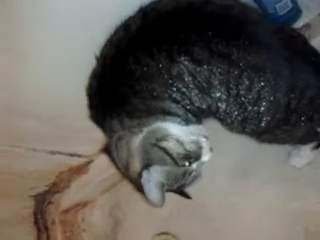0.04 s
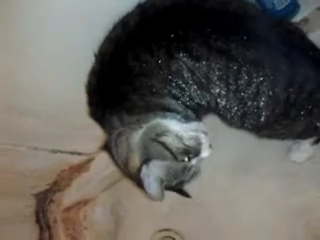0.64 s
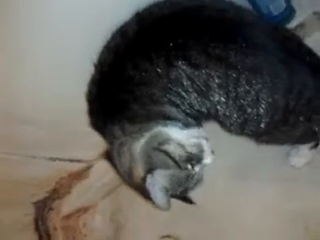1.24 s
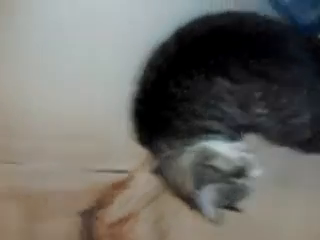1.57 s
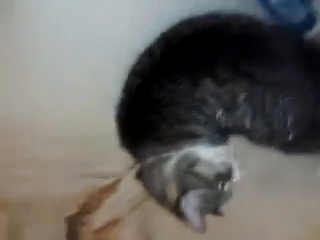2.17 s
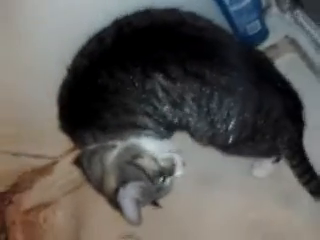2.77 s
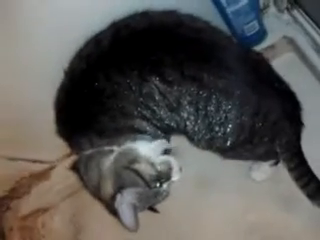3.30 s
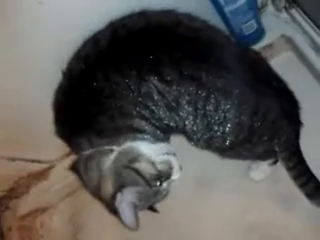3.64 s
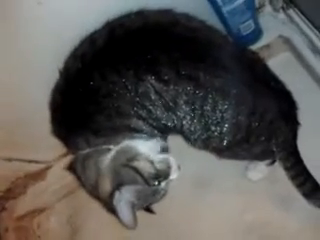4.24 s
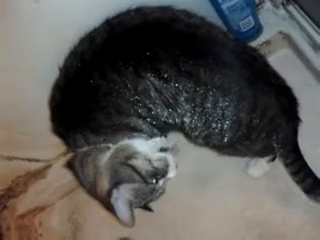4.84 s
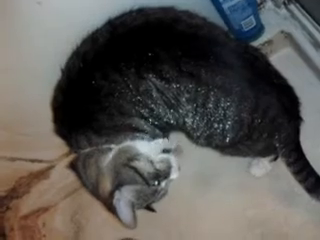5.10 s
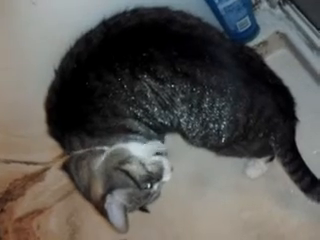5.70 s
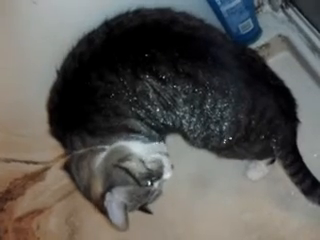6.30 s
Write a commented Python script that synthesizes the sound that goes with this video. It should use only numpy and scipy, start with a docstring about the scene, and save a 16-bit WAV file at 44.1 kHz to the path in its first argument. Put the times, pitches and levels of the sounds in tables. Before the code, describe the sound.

Water drips from a shower head throughout, heard from just above the floor of a small hard-walled stall with a very short echo. Sharp, high ticks hit the wet floor at irregular times and strengths, over a fine patter and a lighter, even drip of nearly five drops a second. Soft splashes on a cat's wet fur and faint, dull thuds on the hollow tray are mixed in. A stronger tick lands at about 0.7 seconds, a cluster between 2.1 and 2.8, and others at 3.4 and 5.1. The loudest drop snaps at about 6 seconds. Running-off water gives a faint, brief gurgle at around 0.7 and 3.2 seconds, and a barely audible thin tone slides down from 3.2 to 3.7. Underneath, a distant machine keeps up a low steady hum and rumble, with a soft wash of air and trickling water.

```python
"""A small hard-walled shower stall, the microphone above the floor, a shower head dripping onto a wet cat.
One nozzle leaks at a steady beat, others let go at random. Drops tick sharply on the wet floor,
splash softly on fur and now and then thud on the hollow tray, over a fine patter.
Water gurgles off twice and a faint tone slides down once. The close walls throw every drop back
at once; farther off, a machine hums low in the building."""
import sys
import numpy as np
from scipy import signal
from scipy.fft import rfft, irfft, next_fast_len
from scipy.io import wavfile
from scipy.ndimage import map_coordinates

SR = 44100
rng = np.random.default_rng(int(sys.argv[2]) if len(sys.argv) > 2 else 0)


def transcribe(signal):
    """Save signal, clipped to [-1, 1], as a 16-bit WAV file at the path in sys.argv[1]."""
    frames = np.atleast_2d(signal).T
    limited = np.clip(frames, -1, 1)
    pcm = np.round(limited * 32767).astype(np.int16)
    wavfile.write(sys.argv[1], SR, pcm)


N = 280917
TOUCH_LEAD_S = .0045  # a drop touches the water film this long before it snaps

# Drops landing squarely on the wet floor. Each row: time in seconds, tick level in dB, pitch in Hz,
# ring time in ms, gain of the slap, knock and echo in dB.
FLOOR_HITS = [(0.4349, -34.5, 6400, 0.19, 7), (0.599, -42.5, 6470, 0.81, 4.5),
              (0.651, -25, 6930, 0.27, -2.5), (0.679, -38.5, 6400, 0.77, 2.5),
              (0.861, -39.5, 6260, 0.54, -2), (0.908, -39.5, 5770, 0.48, 0.5),
              (1.499, -29.5, 6900, 0.28, -5), (1.7144, -30, 5860, 0.2, -2), (1.779, -49, 5150, 0.54, 12.5),
              (1.929, -29.5, 6400, 0.6, -3.5), (2.033, -42, 5330, 0.4, 8), (2.1387, -24.5, 6120, 0.39, -1),
              (2.353, -22.5, 6520, 0.27, -4.5), (2.522, -46, 4800, 1, -29), (2.5671, -19, 6100, 0.32, 2),
              (2.6624, -36.5, 5840, 0.53, -3), (2.691, -42, 5060, 0.96, 4.5),
              (2.7773, -17.5, 7040, 0.24, -6.5), (2.81, -29, 7300, 0.22, 2.5), (2.9111, -37, 5280, 0.57, 1),
              (3.1973, -29, 5800, 0.19, 5), (3.3213, -35.5, 6100, 0.55, 1.5),
              (3.416, -23.5, 6880, 0.31, -3.5), (3.568, -37.5, 5550, 0.59, -3),
              (3.6281, -29, 6270, 0.21, -4.5), (4.055, -31.5, 6200, 0.22, 0.5),
              (4.1221, -27.5, 5770, 0.23, -4.5), (4.2368, -38.5, 5570, 0.58, -8),
              (4.266, -35.5, 6000, 0.19, 4), (4.48, -37.5, 5800, 0.39, 2.5), (4.5625, -36.5, 6000, 0.24, 4),
              (4.783, -37.5, 5560, 0.35, -6), (4.8172, -40, 5080, 0.58, 2.5),
              (4.9053, -37.5, 6000, 0.18, 8), (4.95, -39, 5100, 0.098, 5), (5.1226, -18.5, 6030, 0.4, -3),
              (5.3331, -28, 6200, 0.16, 3), (5.4449, -30, 5480, 0.44, -2), (5.4776, -36, 5200, 0.52, 0.5),
              (5.6604, -35, 6680, 0.97, -2.5), (5.7402, -39, 5380, 1, -14), (5.9717, -12, 5400, 0.23, -1),
              (5.9773, -24, 6900, 0.27, 3), (6.074, -35.5, 6300, 0.19, 2), (6.114, -38, 5300, 0.48, -1),
              (6.1856, -31, 5500, 0.17, 0), (6.335, -35, 6440, 0.21, 2.5)]
# Stray drops ticking on the wet floor. Each row: start in seconds, level in dB.
STRAY_TICKS = [(0.0082, -39), (0.0994, -37), (0.959, -41), (1.2435, -41.5), (1.7469, -39), (3.6066, -40),
               (3.8919, -37.5), (4.5084, -37.5), (4.9216, -41), (5.585, -34)]
# The floor's knock under a tick. Each row: mode in Hz, relative level in dB, 60 dB decay in seconds.
FLOOR_MODES = [(547, -0.5, 0.12), (729, -5, 0.2), (893, 10, 0.028), (1173, -1.5, 0.12), (1303, 6.5, 0.022)]
# The larger splashes on fur. Each row: start in seconds, relative level in dB, centre pitch in Hz,
# pitch spread of the droplets in natural-log units.
FUR_SPLASHES = [(0.0, -57, 1700, 0.45), (0.255, -64, 860, 0.37), (0.438, -51.5, 6650, 0.084),
                (0.44, -62, 2100, 0.17), (0.525, -57.5, 2830, 0.2), (0.669, -64, 2380, 0.09),
                (0.951, -61.5, 1720, 0.19), (1.07, -63, 2130, 0.26), (1.076, -59, 6160, 0.1),
                (1.148, -64.5, 2900, 0.13), (1.412, -59, 2810, 0.076), (1.711, -61.5, 2330, 0.073),
                (1.802, -59, 2540, 0.21), (1.897, -58, 5770, 0.18), (1.915, -64.5, 1520, 0.05),
                (2.058, -60.5, 3330, 0.23), (2.335, -63.5, 2440, 0.12), (2.41, -65.5, 1250, 0.38),
                (2.643, -61.5, 2200, 0.043), (2.717, -58.5, 4380, 0.44), (2.801, -66, 1380, 0.33),
                (3.012, -64.5, 2840, 0.22), (3.196, -66, 1840, 0.37), (3.834, -59.5, 4750, 0.35),
                (3.846, -66.5, 2040, 0.34), (4.324, -62.5, 2560, 0.19), (4.577, -58.5, 4440, 0.3),
                (5.279, -63.5, 4020, 0.1), (5.333, -61.5, 1060, 0.2), (5.415, -59, 2610, 0.59),
                (5.509, -60, 5280, 0.41), (5.54, -59.5, 1080, 0.35), (5.683, -61, 2690, 0.24),
                (5.76, -58, 4970, 0.37), (5.836, -65, 1260, 0.21), (6.069, -67.5, 1880, 0.092)]
# The heaviest drops on the tray. Each row: start in seconds, relative level in dB.
TRAY_HITS = [(0.081, -57), (0.457, -54.5), (0.51, -54.5), (0.726, -54.5), (1.022, -57), (1.34, -55),
             (1.376, -57), (1.621, -58), (1.984, -54), (2.051, -54), (2.394, -54), (2.577, -47),
             (3.115, -56.5), (4.395, -55), (4.516, -54.5), (5.104, -54), (5.432, -57.5), (5.712, -53.5),
             (5.861, -56), (5.976, -54.5), (6.246, -56)]
# The hollow tray's ring. Each row: mode in Hz, relative level in dB, 60 dB decay in seconds.
TRAY_MODES = [(258.9, 5, 0.22), (150.8, -3, 0.2), (349.6, 2, 0.068), (456, -7, 0.19), (585, -5, 0.099),
              (754, -5, 0.11)]
# Water running off. Each row: start in seconds, length in seconds, level in dB, centre pitch in Hz.
RUNOFF = [(0.684, .22, -63, 880), (3.197, .09, -61, 886)]
# How strongly the fine patter falls. Each row: time in seconds, gain in dB.
PATTER_FLOW = [(0, -0.5), (2.801, -1), (3.7, -2), (4.6, -1.5), (5.499, 0.5), (6.3, -3)]
# The faint falling tone. Each row: time in seconds, pitch in Hz, relative level in dB.
TONE_GLIDE = [(3.19, 605, -73), (3.238, 587, -63), (3.3, 579, -71), (3.37, 542, -64), (3.42, 492, -67.5),
              (3.7, 500, -89)]
# The machine's steady tones. Each row: frequency in Hz, rms level in dB.
MACHINE_TONES = [(41.9, -52), (58.5, -61.5)]
# The building's rumble. Each row: frequency in Hz, relative level in dB.
RUMBLE_SPECTRUM = [(10, -3), (24, 0), (35, 0), (44, -13), (75, -15), (100, -18), (150, -28), (250, -60)]
# The wash of air and trickling water. Each row: frequency in Hz, relative level in dB.
WASH_SPECTRUM = [(100, 1.5), (150, 3.5), (300, -1.5), (650, -6), (1150, -14), (1700, -19), (2400, -13.5),
                 (3300, -8.5), (4400, -20), (6200, -10), (7500, -16)]
# The stall's reverberation. Each row: frequency in Hz, 60 dB decay in seconds.
STALL_DECAY = [(250, 0.14), (1000, 0.14), (3000, 0.2), (7000, 0.14)]
# The microphone's colour. Each row: frequency in Hz, gain in dB.
MIC_RESPONSE = [(1800, 0), (2400, .5), (3400, -2.5), (3800, 0), (4150, 4), (4700, 1), (6300, 0), (7200, -1)]


def floor_drips(stray_hz=6030, stray_ring_s=.00025):
    """Square hits on the wet floor, sharpest at the microphone, and the ticks of stray drops."""
    out = np.zeros(N)
    for s, db, hz, ring_ms, echo_db in FLOOR_HITS:
        add(out, s - TOUCH_LEAD_S, amp(db) * drip(hz, ring_ms, echo_db))
    for s, db in STRAY_TICKS:
        tick = ping(seconds(.01), stray_hz * rng.uniform(.9, 1.1), stray_ring_s)
        add(out, s, amp(db) * in_stall(tick, wet_db=0))
    return out


def drip(hz, ring_ms, echo_db, touch_db=-22, slap_db=-33.5, slap_lag_s=.0015, knock_db=-37):
    """One drop hisses into the water film, snaps, slaps the film aside and knocks the floor."""
    out, tick, t = np.zeros(SR // 2), np.zeros(SR // 40), seconds(.01)
    for progress in np.sqrt(rng.random(8)):
        touch = ping(t, hz * rng.uniform(.8, 1.2), ring_s=.0003)
        add(tick, progress * TOUCH_LEAD_S, amp(touch_db) * progress * touch)
    add(tick, TOUCH_LEAD_S, ping(t, hz, ring_ms / 1000))
    add(out, 0, in_stall(tick, echo_db))
    slap = splash(centre_hz=969, spread=.19, length_s=.01099)
    knock = in_stall(struck(FLOOR_MODES, scatter_db=2), wet_db=-2)
    add(out, TOUCH_LEAD_S + slap_lag_s, amp(slap_db + echo_db) * slap)
    add(out, TOUCH_LEAD_S + slap_lag_s, amp(knock_db + echo_db) * knock)
    return out


def leaking_nozzle(first_s=.2232, period_s=.21295, jitter_s=.001, splash_db=-71.5, tick_db=-34):
    """One nozzle fills and lets go at an even beat; its drops splash on fur and tick lightly."""
    out, hit_times = np.zeros(N), np.transpose(FLOOR_HITS)[0]
    for beat in np.arange(first_s, N / SR, period_s):
        late, size_db, pitch = bounded_normal(3)
        s, size, tuning = beat + jitter_s * late, amp(size_db), np.exp(.06 * pitch)
        add(out, s, size * amp(splash_db) * splash(centre_hz=1920 * tuning, spread=.5))
        if np.abs(hit_times - beat).min() > .012:  # no square floor hit already ticks on this beat
            tick = drip(hz=6600 * tuning, ring_ms=.2, echo_db=1)
            add(out, s - TOUCH_LEAD_S, size * amp(tick_db) * tick)
    return out


def fur_splashes(gain_db=3.5):
    """Larger splashes on fur: a plink with a clear bubble if the droplets are alike, else a splat."""
    out = np.zeros(N)
    for s, db, hz, spread in FUR_SPLASHES:
        bubble_db = 1.5 - 35 * spread
        sound = splash(hz, spread, cycles=1.4, bubble_s=.0025, bubble_db=bubble_db, wet_db=-1.5, count=13)
        add(out, s, amp(db + gain_db) * sound)
    return out


def splash(centre_hz, spread, length_s=.036, cycles=2, bubble_s=.0017, bubble_db=-7, wet_db=1, count=18):
    """A drop bursts into a thinning cluster of droplets and traps one ringing bubble."""
    cluster, t = np.zeros(SR // 10), seconds(.016)
    delays = length_s * rng.beta(1.1, 2.4, count)
    pitches = centre_hz * np.exp(spread * bounded_normal(count))
    sizes = amp(3.5 * rng.standard_normal(count))
    for delay, hz, size in zip(delays, pitches, sizes):
        add(cluster, delay, size * ping(t, hz, cycles / hz))
    bubble = ping(t, centre_hz, bubble_s)
    bubble *= np.linalg.norm(cluster) / np.linalg.norm(bubble)
    add(cluster, length_s / 5, amp(bubble_db) * bubble)
    return unit_over(in_stall(cluster, wet_db), length_s)


def tray_thuds(gain_db=-2, push_hz=330, push_cycles=.59, stray_db=-61, stray_count=8):
    """Heavy drops, and lighter strays at random, push the hollow tray and leave it booming briefly."""
    out, t = np.zeros(N), seconds(.02)
    stray_times = rng.uniform(0, N / SR, stray_count)
    stray_levels = stray_db + 1.5 * bounded_normal(stray_count, limit=1.5)
    for s, db in list(TRAY_HITS) + list(zip(stray_times, stray_levels)):
        boom = struck(TRAY_MODES, scatter_db=1.2)
        add(boom, 0, ping(t, push_hz, push_cycles / push_hz))
        add(out, s, amp(db + gain_db) * in_stall(boom, wet_db=-6))
    return out


def drizzle():
    """Bright droplets sizzle on the floor and dull ones on fur, louder and softer with the flow."""
    on_floor = amp(-53.5) * patter(centre_hz=5450, spread=.13, cycles=1.8, wet_db=-1, per_spot=140)
    on_fur = amp(-60) * patter(centre_hz=1930, spread=.42, cycles=.98, wet_db=4, per_spot=80)
    flow_db = np.interp(np.arange(N) / SR, *np.transpose(PATTER_FLOW))
    return amp(flow_db) * (on_floor + on_fur)


def patter(centre_hz, spread, cycles, wet_db, per_spot, spots=8):
    """Fine droplets land at random times around the stall, each spot with its own echoes."""
    out, t = np.zeros(N), seconds(.006)
    for _ in range(spots):
        drops = np.zeros(N)
        times = rng.uniform(0, N / SR, per_spot)
        for s, (mass, pitch, life) in zip(times, bounded_normal((per_spot, 3))):
            hz = centre_hz * np.exp(spread * pitch)
            ring_s = cycles * np.exp(.3 * life) / hz
            add(drops, s, amp(4.2 * mass) * ping(t, hz, ring_s))
        out += in_stall(drops, wet_db)[:N]
    return out


def gurgles(spread=.24, cycles=4, count=60):
    """Water running off traps a quick, overlapping string of large bubbles."""
    out, t = np.zeros(N), seconds(.04)
    for s, length_s, db, centre_hz in RUNOFF:
        bubbles = np.zeros(SR // 2)
        for progress, pitch in zip(rng.random(count), bounded_normal(count)):
            hz = centre_hz * np.exp(spread * pitch)
            add(bubbles, progress * length_s, ping(t, hz, cycles / hz))
        add(out, s, amp(db) * unit_over(in_stall(bubbles, wet_db=4), length_s))
    return out


def falling_tone(gain_db=-9):
    """A thin, unsteady tone slides down once, smeared by the walls and barely above the patter."""
    t = np.arange(N) / SR
    times, hz, db = np.transpose(TONE_GLIDE)
    level = np.interp(t, times, amp(db), left=0, right=0)
    pitch = np.interp(t, times, hz) * (1 + .06 * wobble(120))
    tone = level * np.sin(2 * np.pi * np.cumsum(pitch) / SR)
    return amp(gain_db) * in_stall(tone, wet_db=12)[:N]


def room_tone(rumble_db=-52.5, wash_db=-60):
    """A machine hums over the building's rumble, with a soft wash of air and trickling water."""
    t = np.arange(N) / SR
    hum = sum(amp(db) * np.sqrt(2) * np.sin(2 * np.pi * (hz * t + rng.random()))
              for hz, db in MACHINE_TONES)
    rumble = amp(rumble_db) * noise(RUMBLE_SPECTRUM)
    wash = amp(wash_db + wobble(20)) * noise(WASH_SPECTRUM)
    return hum + rumble + wash


def ping(t, hz, ring_s):
    """A tiny air pocket rings: it swells to 1 at the ring time, then dies while the pitch lifts."""
    age = t / ring_s
    envelope = (age * np.exp(1 - age)) ** 3
    lift = 1 + .02 * (np.minimum(age, 6) - 2)
    return envelope * np.sin(2 * np.pi * hz * t * lift)


def struck(modes, scatter_db, detune=.0056):
    """Damped modes, at new strengths and slightly new pitches for each wet spot that is hit."""
    out, t = 0, seconds(.22)
    for hz, db, t60 in modes:
        envelope = amp(db + scatter_db * rng.normal() - 60 * t / t60)
        pitch = hz * (1 + detune * rng.normal())
        out += envelope * np.sin(2 * np.pi * pitch * t) * rng.choice([-1, 1])
    return out


def in_stall(sound, wet_db):
    """The sound plus the dense echoes of the close walls, different for every landing spot."""
    hz, t, spectrum = signal.stft(rng.standard_normal(SR // 5), SR, nperseg=256)
    decay = amp(-60 * t / along(STALL_DECAY, hz)[:, None])
    _, tail = signal.istft(spectrum * decay, SR, nperseg=256)
    response = amp(wet_db) * tail / np.linalg.norm(tail)
    response[0] += 1  # the direct path to the microphone
    return signal.oaconvolve(sound, response)


def amp(db):
    """Decibels to gain."""
    return 10 ** (np.asarray(db) / 20)


def unit_over(sound, length_s):
    """Scale to the energy of rms 1 held for length_s."""
    return np.sqrt(length_s * SR) * sound / np.linalg.norm(sound)


def along(points, hz):
    """Read (Hz, value) points on a log axis."""
    knots_hz, values = np.transpose(points)
    return np.interp(np.log(hz + 1), np.log(knots_hz), values)


def seconds(length_s):
    """A time axis."""
    return np.arange(int(length_s * SR)) / SR


def add(track, s, sound):
    """Mix a sound into the track at s seconds."""
    start = int(np.clip(round(s * SR), 0, N))
    track[start:start + len(sound)] += sound[:N - start]


def bounded_normal(shape, limit=2):
    """Normal draws clipped at the limit on both sides."""
    return np.clip(rng.standard_normal(shape), -limit, limit)


def wobble(rate):
    """A smooth random curve, rate knots a second."""
    knots = rng.standard_normal(int(N * rate / SR) + 4)
    return map_coordinates(knots, [np.arange(N) * rate / SR])


def filtered(sound, response):
    """Filter by a gain given as a function of Hz."""
    size = next_fast_len(len(sound) + 8192)
    gain = response(np.fft.rfftfreq(size, 1 / SR))
    return irfft(rfft(sound, size) * gain, size)[:len(sound)]


def noise(spectrum):
    """Coloured noise of rms 1."""
    coloured = filtered(rng.standard_normal(N), lambda hz: amp(along(spectrum, hz)))
    return unit_over(coloured, N / SR)


def scene():
    """Everything as heard from one spot above the stall floor."""
    water = leaking_nozzle() + floor_drips() + fur_splashes() + gurgles() + tray_thuds() + drizzle()
    return (water + falling_tone() + room_tone())[None]


def record(dry, edge_hz=7290, shelf_db=-23, top_hz=9000):
    """The colour of a small microphone with a presence peak. Above 7.3 kHz the treble falls steeply; only a
    faint layer remains, and all ends at 9 kHz."""
    def treble_fall(hz):
        rolloff = 1 / np.sqrt(1 + (hz / edge_hz) ** 100)
        return np.maximum(rolloff, amp(shelf_db)) * (hz < top_hz)

    at_mic = filtered(dry[0], lambda hz: amp(along(MIC_RESPONSE, hz)))
    return filtered(at_mic, treble_fall)[None]


dry = scene()
out = record(dry)
transcribe(out)
```